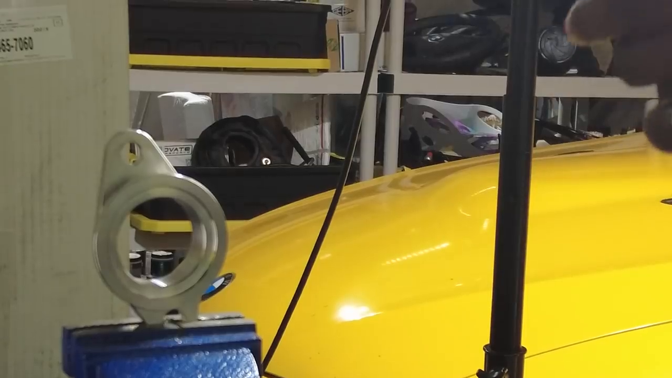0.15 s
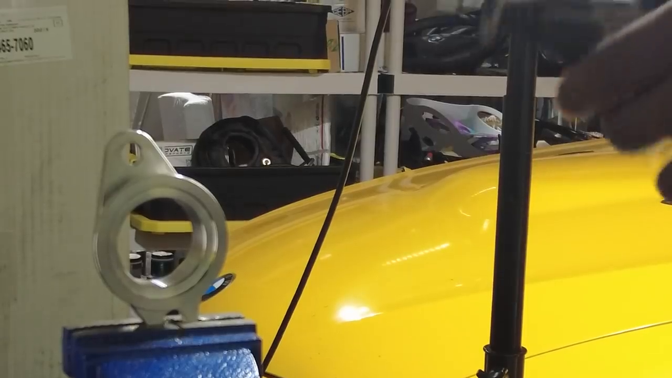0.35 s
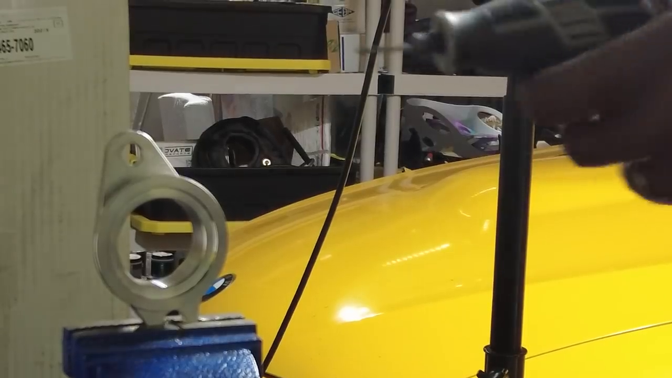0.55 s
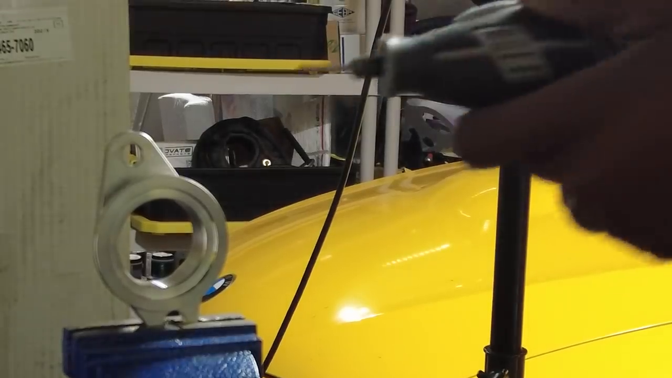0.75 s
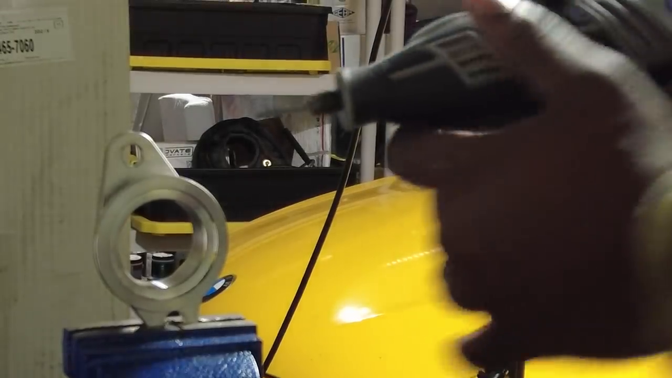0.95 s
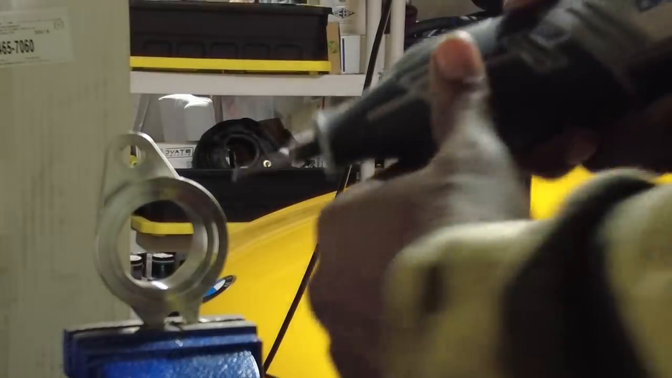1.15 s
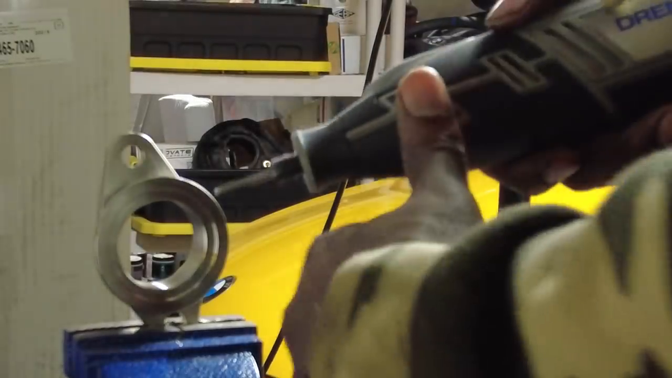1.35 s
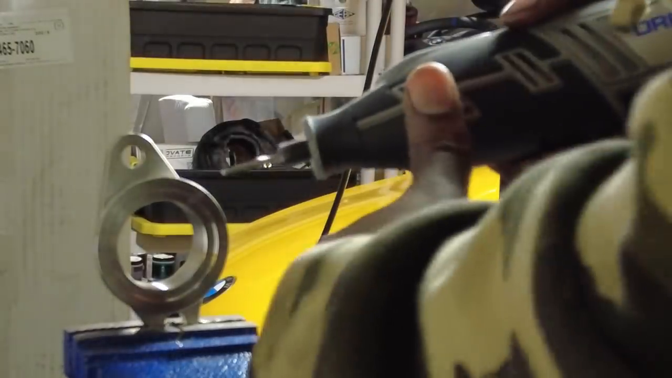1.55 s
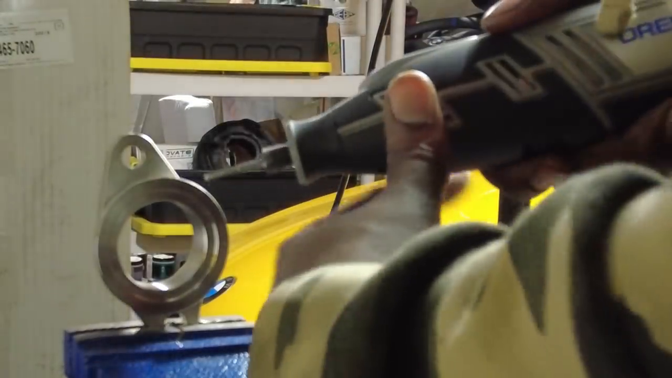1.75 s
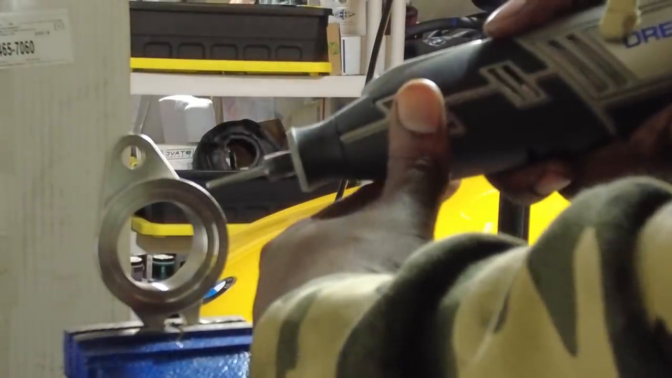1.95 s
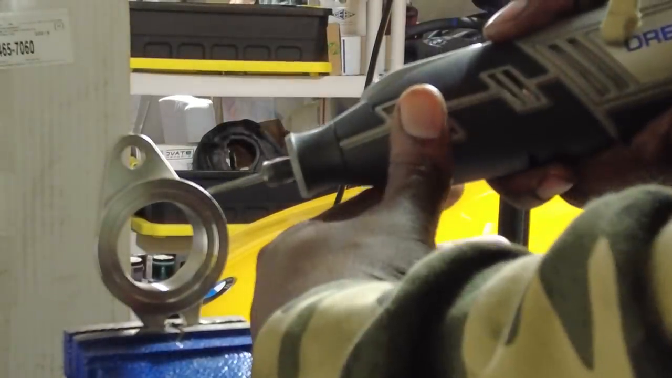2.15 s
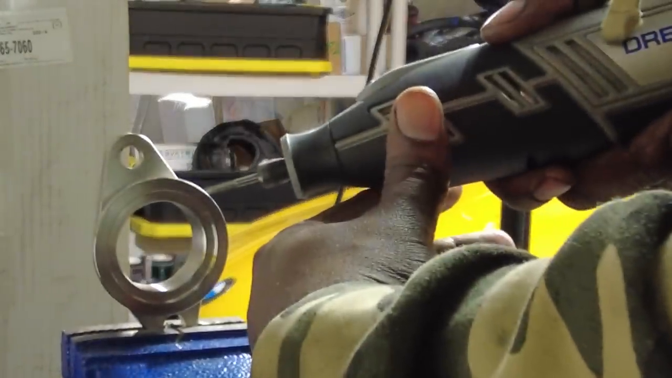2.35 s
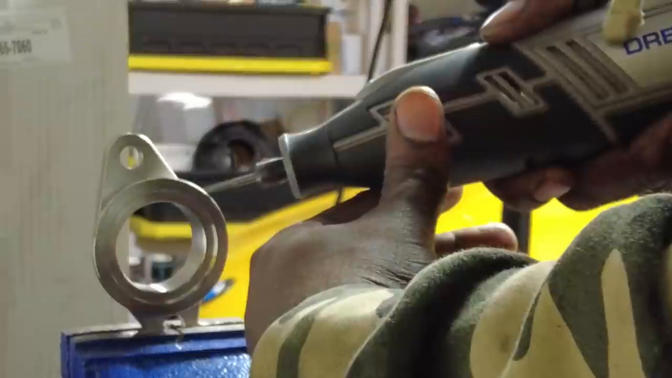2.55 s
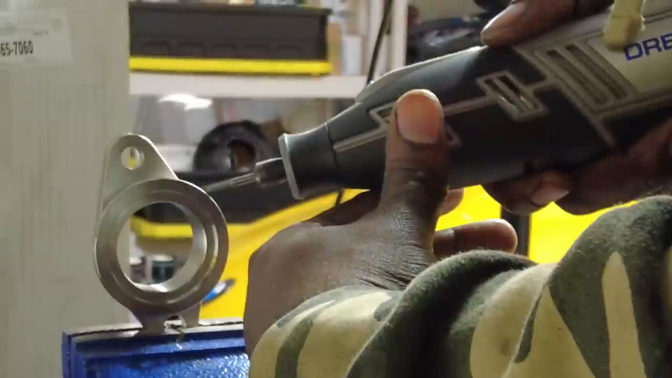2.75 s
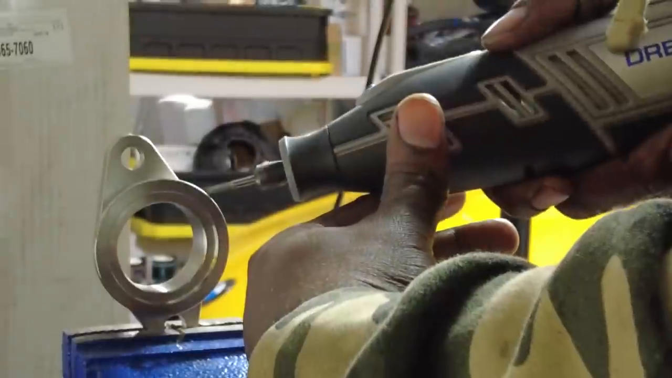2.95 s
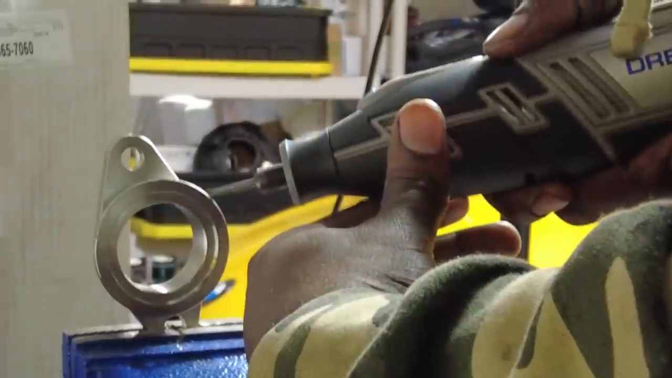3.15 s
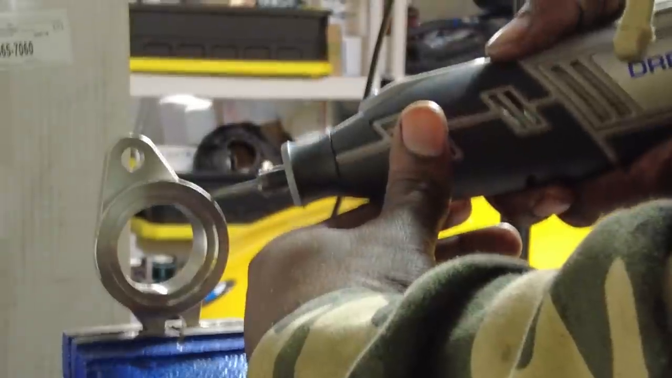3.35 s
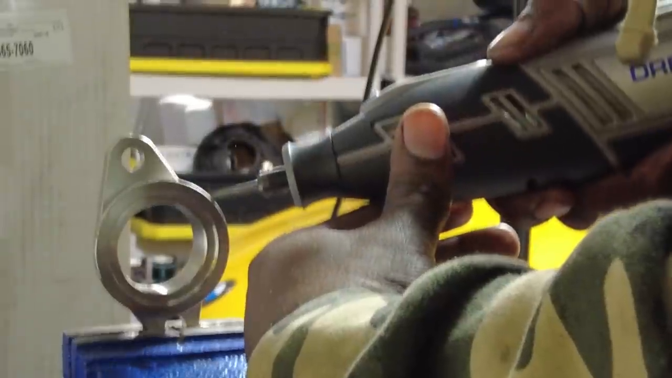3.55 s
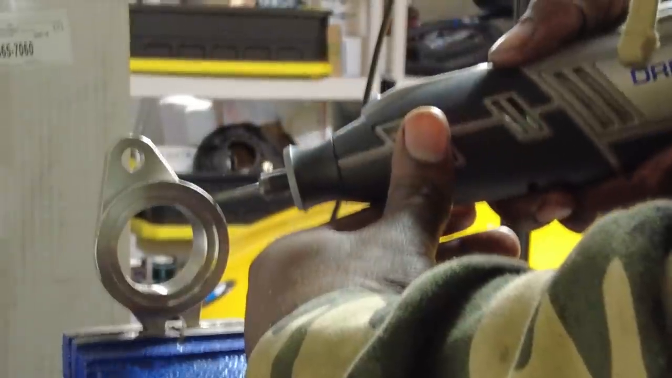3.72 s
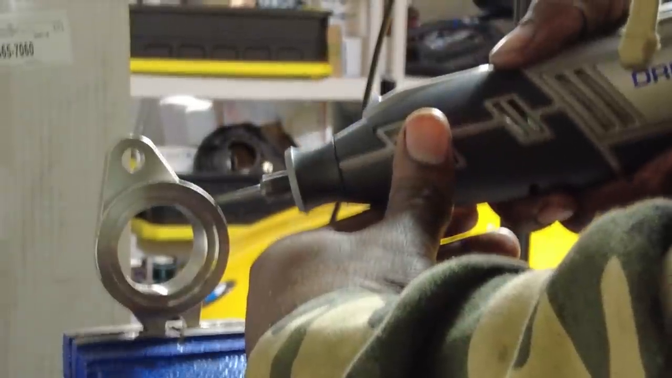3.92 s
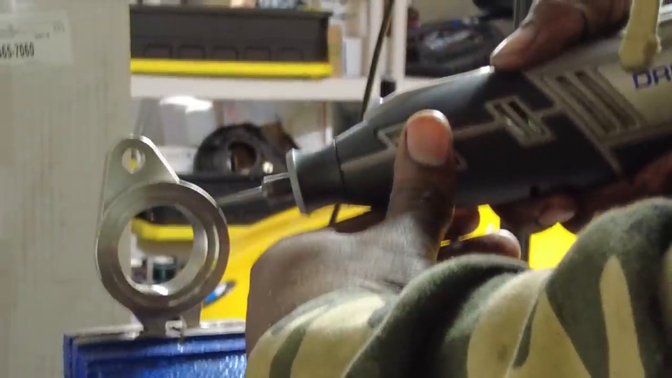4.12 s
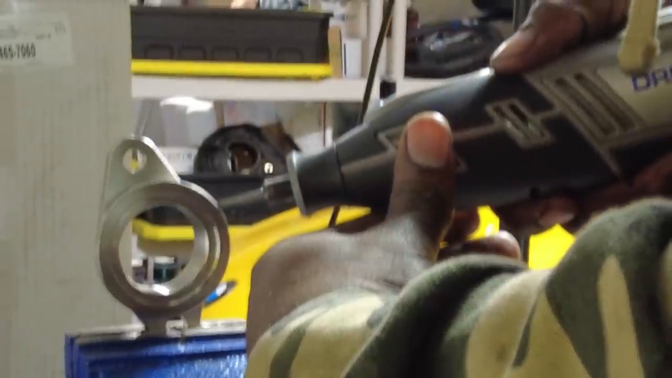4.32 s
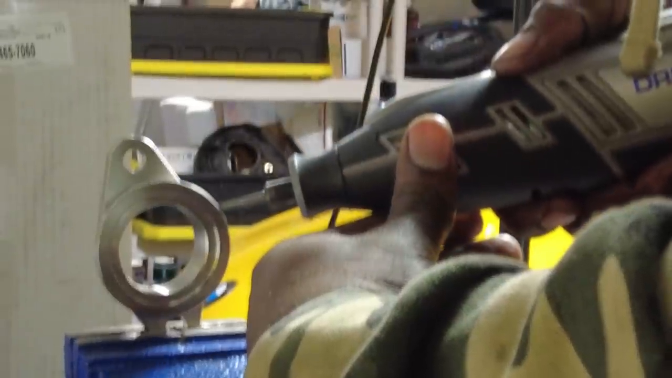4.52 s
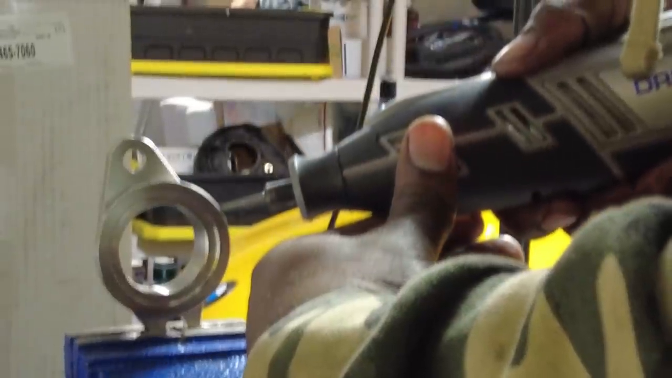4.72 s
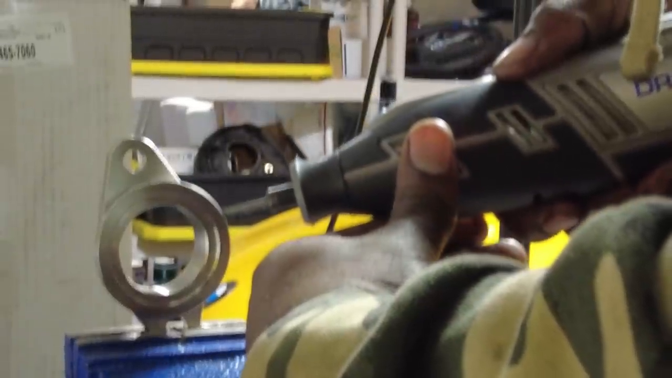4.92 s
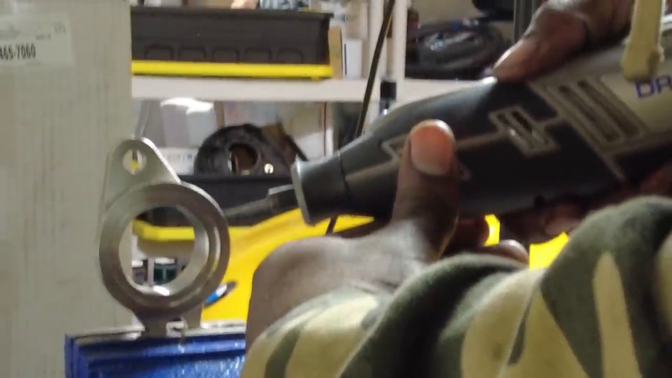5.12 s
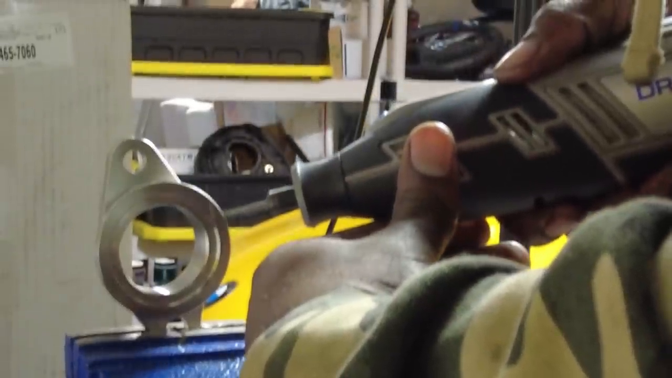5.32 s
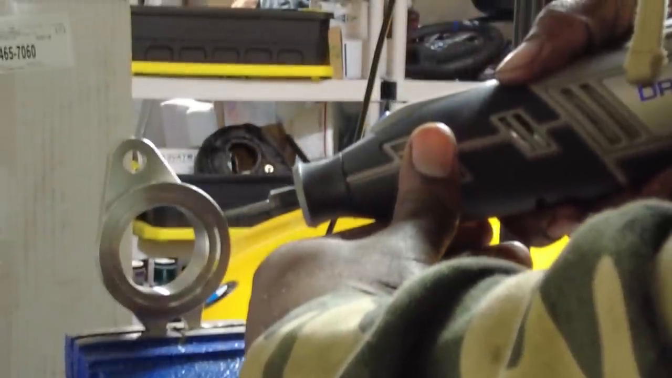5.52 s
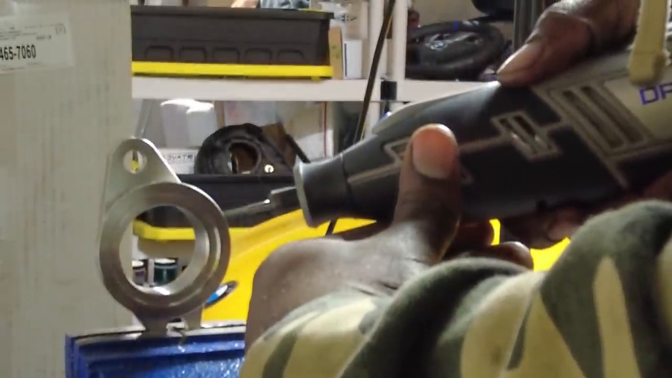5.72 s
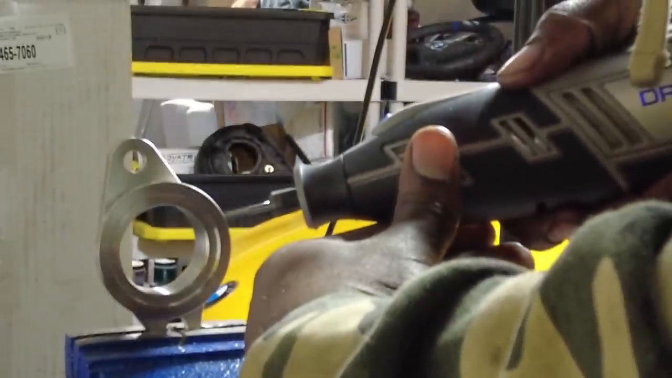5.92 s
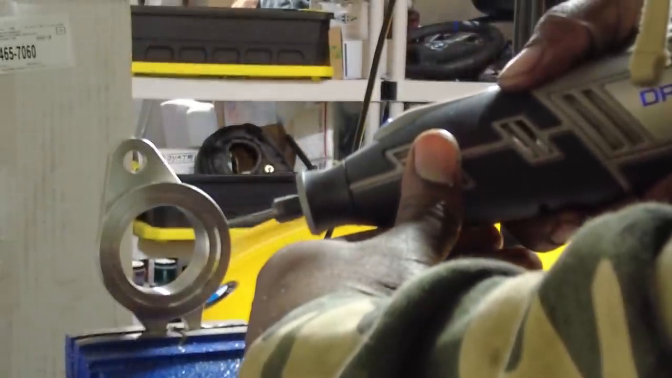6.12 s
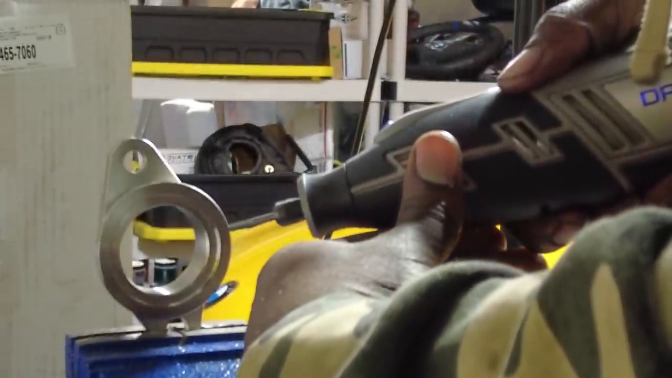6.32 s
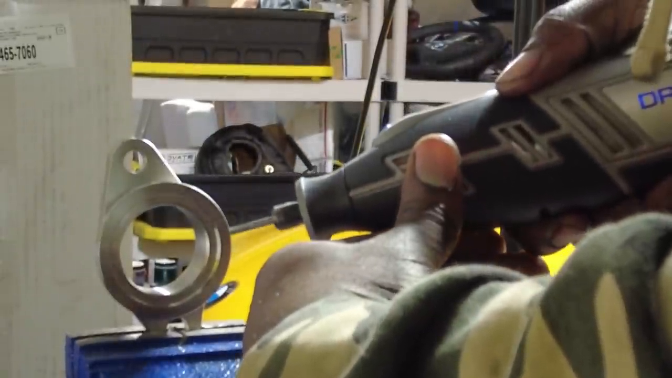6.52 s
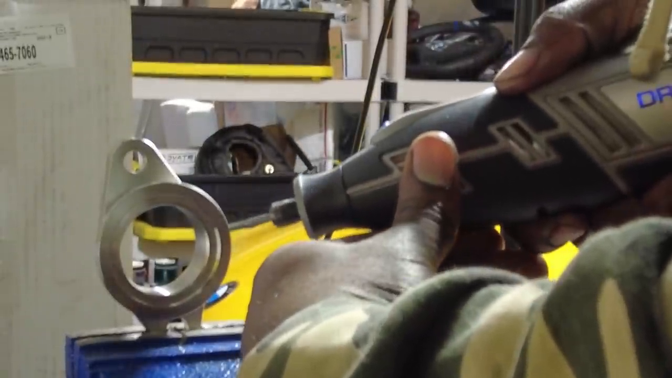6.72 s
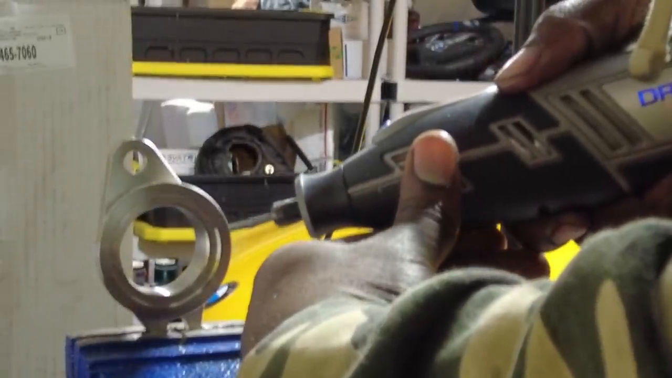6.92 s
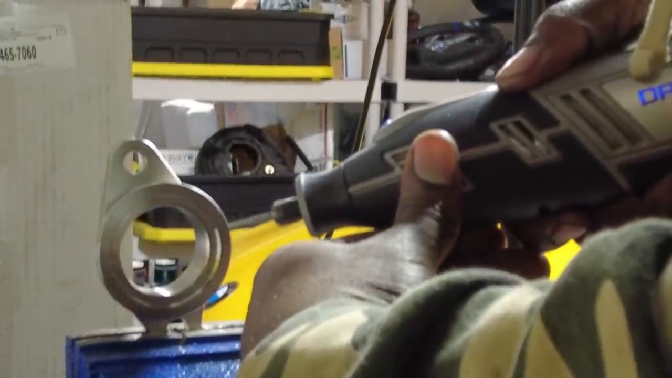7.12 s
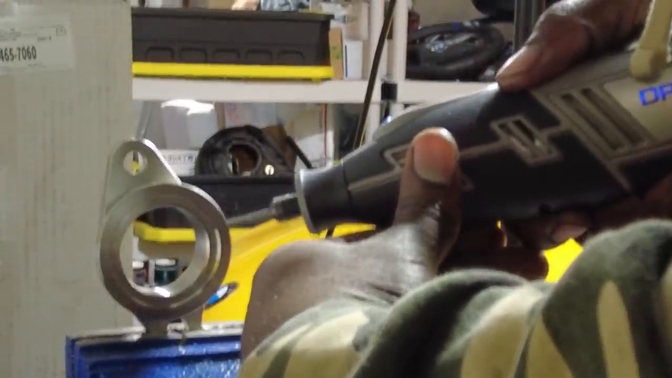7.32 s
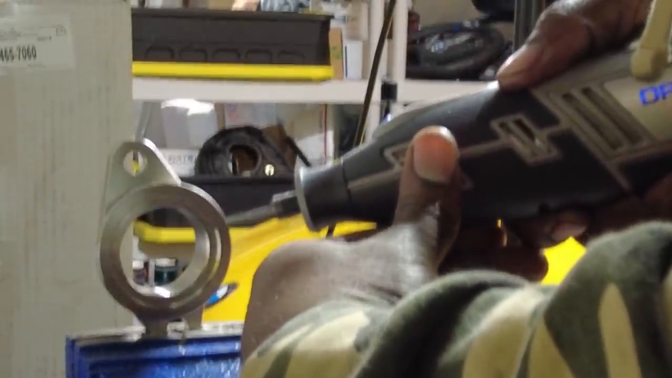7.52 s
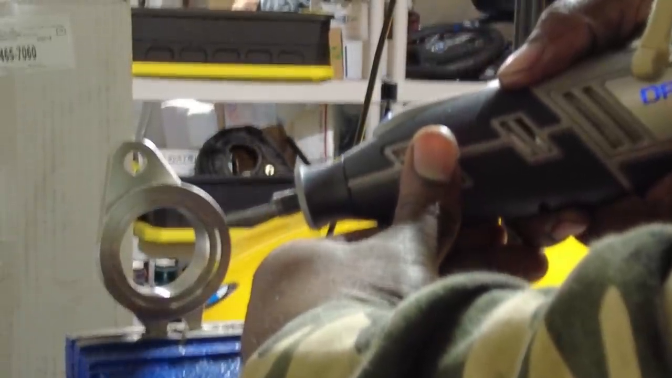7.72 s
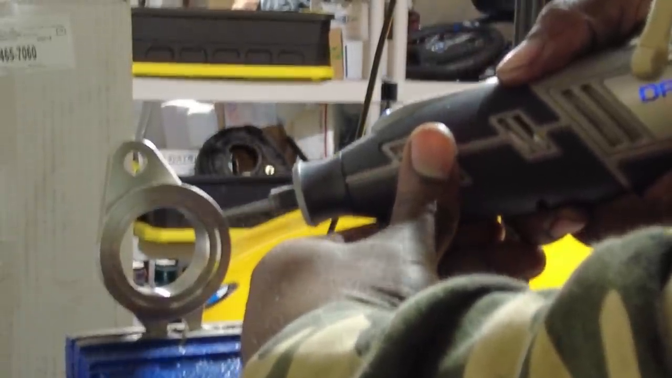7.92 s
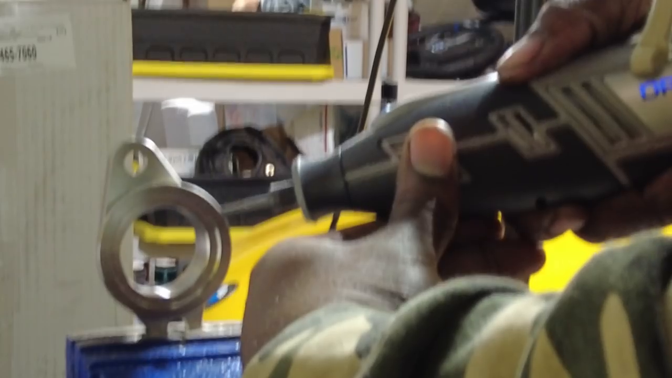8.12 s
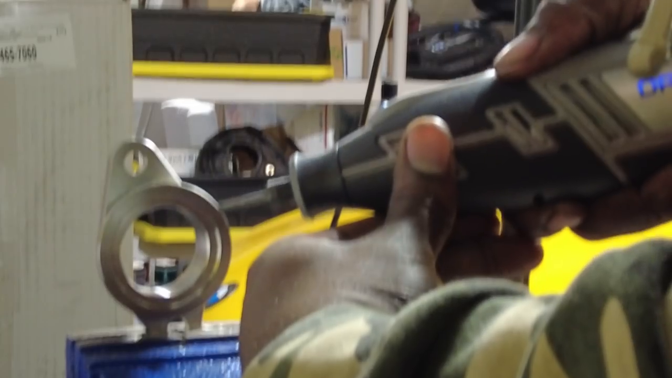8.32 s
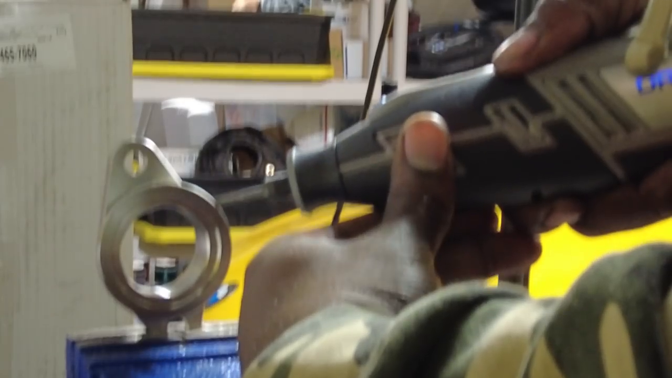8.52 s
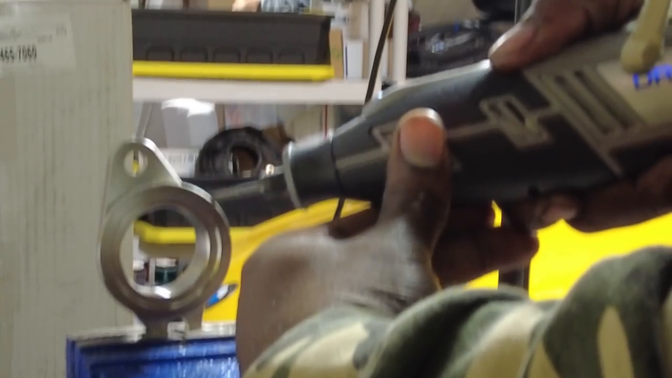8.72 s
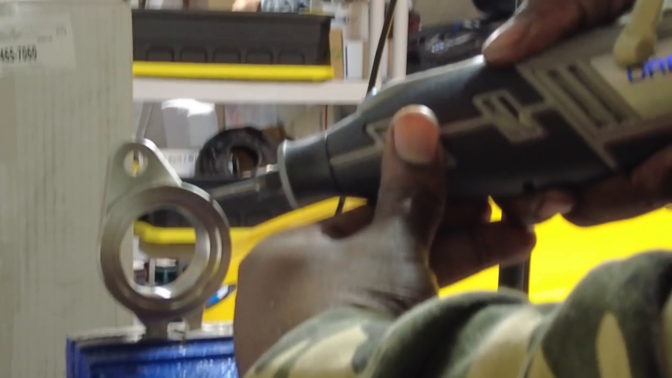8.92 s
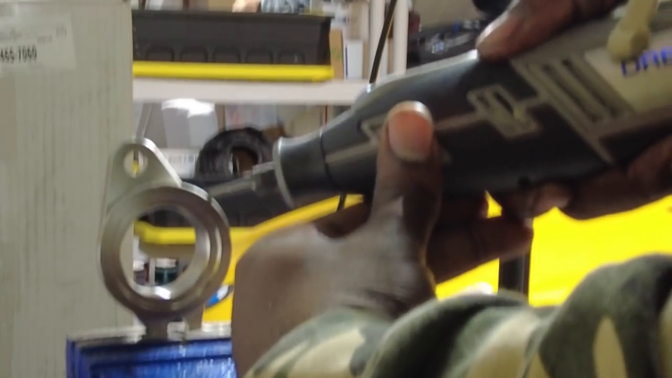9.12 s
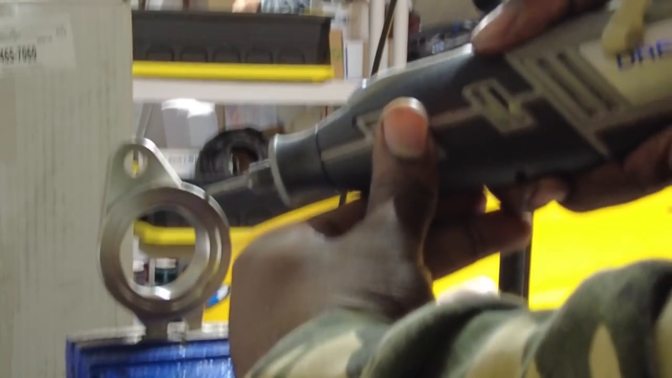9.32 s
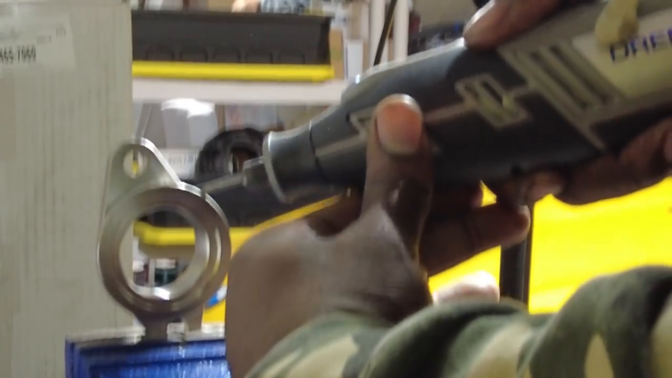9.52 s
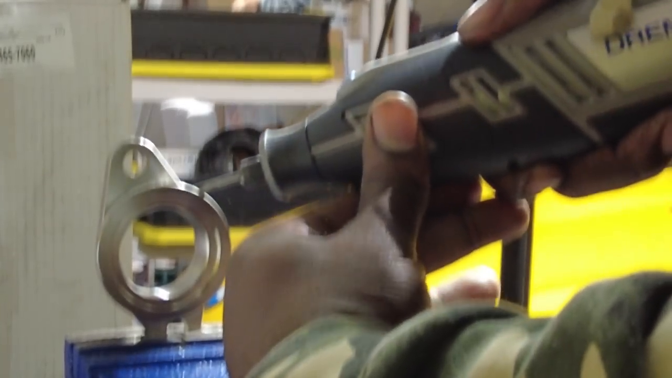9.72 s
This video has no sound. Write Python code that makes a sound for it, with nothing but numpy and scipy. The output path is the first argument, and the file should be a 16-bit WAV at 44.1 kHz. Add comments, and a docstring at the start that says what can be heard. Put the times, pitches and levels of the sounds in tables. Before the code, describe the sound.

A handheld rotary tool spins up, whines, then grinds a metal flange twice with a ringing, hissing rasp in a garage.

```python
"""A handheld rotary tool grinds a metal flange in a vice: it spins up, touches once, then cuts twice.
The off-centre cutter strikes once a turn and rings the flange, chips hiss, and the tone colour shifts
as the hand moves from spot to spot. Under the cut the unbalanced shaft drones, bearings whine and the
fan blows; the housing rattles in the loose first grip. The garage adds a short echo, rumble and hum.
All is heard through the two close microphone ports of a camera near the vice."""
import sys
import numpy as np
from scipy import signal
from scipy.fft import rfft, irfft, next_fast_len
from scipy.io import wavfile
from scipy.ndimage import uniform_filter1d

SR = 44100
rng = np.random.default_rng(int(sys.argv[2]) if len(sys.argv) > 2 else 0)


def transcribe(u):
    """Save the signal u as a 16-bit wav file named by the first command-line argument.

    u: samples, shape (n,) or (channels, n), limited to [-1, 1]; the rate is SR.
    q: integer samples, one column per channel.
    """
    v = np.clip(np.atleast_2d(u).T, -1, 1)
    q = np.round(v * 32767).astype(np.int16)
    wavfile.write(sys.argv[1], SR, q)


N = 430416
FULL_HZ, CAGE_TURNS = 295, 8  # working shaft speed; shaft turns per beat of the bearing cage


def grinding(turns, drop_db):
    """The cutter rings the flange and throws chips, whose hiss pulses once a turn."""
    # how hard the cutter bites, one envelope per contact: time_s, level_db
    cuts = [
        [(2.853, -33), (2.863, -25), (2.878, -32)],
        [(2.997, -20.5), (3.06, -18.5), (3.3, -17), (3.58, -23), (4.1, -20), (4.5, -19.5), (4.75, -19.5),
         (4.92, -17.5), (5.2, -18), (5.66, -20.5), (5.7, -28.5), (5.76, -27), (5.79, -39)],
        [(6.407, -21.5), (6.44, -19), (6.5, -16), (6.75, -16.5), (7.3, -19.5), (7.8, -18.5), (7.97, -18),
         (8.25, -19), (8.47, -20.5), (8.52, -16.5), (8.6, -22.5), (8.74, -18.5), (9.0, -21), (9.25, -18),
         (9.76, -19.5)],
    ]
    # flange resonances: pitch_hz, width_hz, side_db (relative to mid)
    flange_modes = [(1209.6, 137, 2), (1448, 170, -14), (1760, 199, -29), (2882, 860, -12.5),
                    (3538, 166, -9.5), (4240, 410, -15), (6127, 580, -29), (7780, 960, -22),
                    (8970, 390, -11.5), (12130, 330, -12), (13900, 360, -9)]
    # balance at each spot, relative to the cut: chips_db, then ring_db for each resonance
    spot_mix = {"touch": (-13, -27, -23, -13, -13, -16, -5, -6, -21, -10, -25, -28),
                "rim": (-9.5, -6, -26.5, -12.5, -9.5, -9.5, -8.5, -6.5, -22, -14.5, -22.5, -28),
                "face": (-9.5, -21.5, -28, -12.5, -12, -15.5, -12, -5, -17, -10, -17, -24),
                "groove": (-10, -19.5, -28, -10.5, -8.5, -8.5, -14, -8.5, -22, -13, -22, -25),
                "edge": (-11.5, -10.5, -34, -12.5, -11, -12.5, -7, -6, -19, -18, -19, -21),
                "graze": (-12, -5, -25, -15.5, -10.5, -10, -2.5, -9.5, -19, -20, -22, -23),
                "bore": (-7, -15.5, -19.5, -14, -14, -7.5, -6.5, -6.5, -22, -20, -23, -23),
                "lip": (-7, -8.5, -20, -9.5, -13.5, -7.5, -8, -11, -23, -29, -25, -27),
                "step": (-5, -7.5, -19.5, -5, -11, -10, -10, -9.5, -20, -28, -26, -30),
                "burr": (-5, -9, -11, -8, -10, -9, -9.5, -9, -18.5, -24, -26, -36)}
    # colour of the chip hiss: frequency_hz, density_db
    chip_spectrum = [(210, -55), (350, -31.5), (868, -9.5), (1030, -51), (1170, 4), (1330, -14.5),
                     (1720, -5.5), (2190, -8), (3470, -5.5), (6260, -1), (15800, -14.5)]
    level_db = np.max([curve(cut, -120)[0] for cut in cuts], axis=0) - drop_db
    chips_db, *ring_db = at_spot(spot_mix)
    force = cutter_force(turns)
    flange = 0
    for k, ((hz, width, side_db), db) in enumerate(zip(flange_modes, ring_db)):
        gain = undb(db + 2.0 * walk(30) - 0.3 * drop_db)  # rings drop further than chips in a skip
        mode = (-1) ** k * ring(force, hz, width) * gain
        flange = flange + ports(mode, np.roll(mode, int(SR / hz / 4)), side_db)
    pulse = 1 + .5 * np.cos(2 * np.pi * turns)
    chips = ports(noise(chip_spectrum) * pulse, noise(chip_spectrum), -1.36)
    chips *= undb(chips_db + 1.36 * walk(20))
    return (flange + chips) * undb(level_db + 0.78 * walk(25))


def cutter_force(turns):
    """The off-centre cutter lands one uneven blow a turn and scrapes after each."""
    # roughness at each spot: scrape_share (0-1, of the power)
    roughness = {"touch": (.1,), "rim": (.07,), "face": (.07,), "groove": (.05,), "edge": (.08,),
                 "graze": (.06,), "bore": (.12,), "lip": (.1,), "step": (.2,), "burr": (.4,)}
    hits = np.flatnonzero(np.diff(np.floor(turns))) + 1
    late = (turns[hits] % 1) / (turns[hits] - turns[hits - 1])  # samples since the exact blow
    strength = undb(2.06 * rng.standard_normal(N // 100)[:len(hits)])
    taps = np.arange(-8, 8)
    clicks = np.sinc(taps + late[:, None]) * np.hanning(18)[1:-1]  # placed between samples
    blows = np.zeros(N + 16)
    blows[hits[:, None] + taps + 8] = strength[:, None] * clicks
    scrape = np.exp(-(turns % 1) / 0.66) * rng.standard_normal(N)
    share = at_spot(roughness)[0]
    return np.sqrt(1 - share) * unit(blows[8:N + 8]) + np.sqrt(share) * unit(scrape)


def cutter_skips():
    """How many dB the cut drops as the cutter skips, a bell-shaped dip each time."""
    # skips: centre_s, drop_db, length_s
    skips = [(3.025, 4.5, 0.011), (3.217, 4.5, 0.015), (3.333, 4.5, 0.043), (3.796, 4.5, 0.02),
             (3.889, 4, 0.013), (4.056, 3.5, 0.084), (4.284, 4, 0.029), (5.168, 4, 0.026),
             (5.267, 4.5, 0.067), (5.439, 5.0, 0.047), (5.568, 4, 0.055), (6.45, 4, 0.03), (6.788, 4, 0.03),
             (7.004, 4, 0.031), (7.095, 4.5, 0.022), (7.167, 4, 0.036), (7.24, 4.5, 0.03),
             (7.333, 4, 0.042), (7.518, 4, 0.045), (7.673, 3, 0.03), (7.801, 4, 0.0966), (8.025, 4, 0.024),
             (8.195, 5.5, 0.076), (8.25, 4, 0.04), (8.376, 3.5, 0.061), (8.44, 5, 0.028),
             (8.553, 4.5, 0.0571), (8.67, 3, 0.04), (8.788, 6.5, 0.029), (8.901, 4.5, 0.09),
             (8.951, 3, 0.04), (9.188, 3, 0.025), (9.31, 3, 0.02), (9.374, 2.5, 0.029), (9.448, 3, 0.024)]
    t = np.arange(N) / SR
    return sum(db * np.exp(-(2 * (t - s) / length) ** 2) for s, db, length in skips)


def shaft_turns(drop_db, ease_hz_per_db=0.72, ease_s=0.028):
    """Running count of turns; the shaft gains speed while the cutter skips."""
    # shaft speed without the skips: time_s, speed_hz
    speed = [(0, 100), (.1, 140), (.19, 180), (.25, 212), (.34, 265), (.4, 284), (.5, 293.5), (.65, 298),
             (3.0, 303.2), (3.42, 296.5), (4.4, 297.4), (5.15, 297), (5.65, 301.5), (5.95, 307.5),
             (6.2, 308.6), (6.42, 308.6), (7.0, 294), (7.4, 292), (7.8, 291), (8.0, 294), (8.2, 290.5),
             (9.05, 290.5), (9.45, 287.5), (9.76, 288.5)]
    surge_hz = ease_hz_per_db * uniform_filter1d(drop_db, int(ease_s * SR))
    return np.cumsum(curve(speed)[0] + surge_hz) / SR


def unbalance(turns):
    """Unbalance shakes hand and vice: a drone and rumble that grow steeply with speed."""
    # shake at each spot: first_order_db, second_order_db, third_order_db, rumble_db
    spot_shake = {"far": (-50.5, -64, -60, -80), "near": (-45, -50.5, -41, -80),
                  "touch": (-48, -53, -47, -80), "lifted": (-50, -65, -31.5, -66),
                  "graze": (-52, -44, -40, -60), "rim": (-40, -39.5, -33, -62),
                  "face": (-44.5, -53, -31.5, -77), "groove": (-43, -41.5, -28.5, -71),
                  "edge": (-49, -43, -36, -68), "bore": (-47.5, -36, -42, -60), "lip": (-40, -40, -42, -64),
                  "step": (-38, -46, -36, -63), "burr": (-33, -51, -43, -49.5)}
    # colour of the rumble: frequency_hz, density_db
    rumble_spectrum = [(40, -20), (100, -8), (160, 0), (240, -7), (380, -23), (500, 8), (700, -20),
                       (1500, -60)]
    *order_db, rumble_db = at_spot(spot_shake)
    rumble = undb(rumble_db + 2.3 * walk(8)) * noise(rumble_spectrum)
    drone = sum(undb(db) * tone(turns, k + 1, 1.4) for k, db in enumerate(order_db))
    shake = (rumble + drone) * speed_ratio(turns) ** 7.7
    return ports(shake, np.roll(shake, 20), -17.0)


def motor(turns, air_db=4.0, brush_db=-21.5):
    """Fan air, bearing whine and a treble comb from the brushes; the cage flutters air and comb."""
    # colour of the fan air: frequency_hz, density_db
    fan_spectrum = [(210, -26), (350, -18.5), (398, -27), (631, -11.5), (827, -19), (925, -1.5),
                    (1080, -21), (1470, -7.5), (1590, -9), (2650, -10.5), (3820, -16), (4550, -13),
                    (15800, -25)]
    # bearing, armature and fan tones: shaft_multiple, level_db
    whine_orders = [(2.11, -14.5), (3.125, -11.5), (3.25, -15), (4.125, -10), (4.75, -25), (4.88, -8),
                    (5, -14), (6, -29), (6.12, -12.5), (6.25, -22), (6.38, -23), (9, -10.5), (12, -17),
                    (13, -12.5), (16, -13.5), (24, -20.5), (25, -15), (31, -17), (32, -41)]
    # whine with the tool held far or near: gain_db
    whine_trim = {"far": (-4.5,), "near": (0.0,)}
    # motor fader as the hand carries the tool: time_s, gain_db
    carry = [(0.0, -50.5), (0.49, -38.5), (0.85, -37), (2.8, -36.5), (5.85, -34), (6.33, -36)]
    cage = np.sin(2 * np.pi * turns / CAGE_TURNS)
    air = ports(noise(fan_spectrum) * (1 + 0.12 * cage), noise(fan_spectrum), -7.5) * undb(walk(12))
    whine = sum(undb(db) * tone(turns, k) for k, db in whine_orders)
    whine *= undb(at_spot(whine_trim)[0]) * speed_ratio(turns) ** 1.4
    brushes = sum(tone(turns + .003 * cage, k, 3.8) for k in range(37, 53))
    tones = whine + undb(brush_db) * brushes
    return (undb(air_db) * air + ports(tones, np.roll(tones, 3), -24)) * undb(curve(carry)[0])


def housing_rattle(turns):
    """In the loose first grip, each cage beat rings the housing with a knock and a noisy tail."""
    # housing resonances: pitch_hz, width_hz, relative_db
    housing_modes = [(1255, 88, 1), (1570, 130, -2), (1846, 140, -7), (2650, 300, -4), (3140, 150, -8)]
    # rattle envelope: time_s, level_db
    envelope = [(.3, -60), (.33, -41.5), (.7, -39), (1.0, -38), (1.2, -52), (1.5, -70)]
    beat = (turns / CAGE_TURNS) % 1
    knocks = unit(np.diff(beat, prepend=0) < 0)
    force = knocks + unit(np.exp(-beat / .5) * rng.standard_normal(N))
    rings = unit(sum(undb(db + 2.0 * walk(12)) * ring(force, hz, width)
                     for hz, width, db in housing_modes))
    return ports(rings, np.roll(rings, 9), -8) * undb(curve(envelope, -120)[0])


def spin_up(turns, end_s=0.58, fade_s=0.2):
    """Rising whines that swell with speed and fade as the shaft settles."""
    # orders that sing out: shaft_multiple, level_db
    orders = [(6, -49), (8, -45), (12, -45.5)]
    t = np.arange(N) / SR
    swell = speed_ratio(turns) ** 1.3 * np.clip((end_s - t) / fade_s, 0, 1)
    return swell * sum(undb(db) * tone(turns, k, 1.9) for k, db in orders)


def speed_control(turns, switch_hz=8200, level_db=-49, fade_s=0.87):
    """Two thin whistles, 3 and 6 shaft orders below the switching rate, fall and fade at the start."""
    t = np.arange(N) / SR
    whistles = sum(np.sin(2 * np.pi * (switch_hz * t - k * turns)) for k in (3, 6))
    return whistles * undb(level_db) * np.clip(1 - t / fade_s, 0, 1)


def garage_echo(direct, t60_s=0.33, level_db=-6):
    """The walls answer with a short diffuse tail, different at each port."""
    t = np.arange(SR // 2) / SR
    tail = rng.standard_normal((2, len(t))) * undb(-60 * t / t60_s)
    tail /= np.linalg.norm(tail, axis=1, keepdims=True)
    return undb(level_db) * signal.fftconvolve(direct.mean(axis=0, keepdims=True), tail, axes=1)[:, :N]


def garage_tone(rumble_db=-52):
    """A bed of low rumble and two steady hums."""
    # colour of the room rumble: frequency_hz, density_db
    room_spectrum = [(12, -34), (20, 3), (62, -0.5), (71, -4), (86, -12.5), (124, -7), (260, -19),
                     (340, -34), (570, -120)]
    # hums: pitch_hz, level_db
    hum_tones = [(59, -57.5), (465, -59.5)]
    t = np.arange(N) / SR
    hums = sum(np.sqrt(2) * undb(db) * np.sin(2 * np.pi * hz * t) for hz, db in hum_tones)
    return undb(rumble_db) * ports(noise(room_spectrum), noise(room_spectrum), -25) + hums


def duck(cut, threshold_db=-30, slope=0.9, lag_s=0.17):
    """The camera's automatic gain, which sinks as the cut gets loud."""
    pole = np.exp(-1 / (lag_s * SR))
    level_db = 10 * np.log10(uniform_filter1d(cut ** 2, 2000) + 1e-12)
    over_db = np.maximum(level_db - threshold_db, 0)
    return undb(-slope * signal.lfilter([1 - pole], [1, -pole], over_db))


def at_spot(table, glide_s=0.13):
    """Columns of a table of spots at every sample, gliding as the hand moves."""
    # where the hand holds the tool: start_s, spot
    hand_moves = [(0, "far"), (1.08, "near"), (2.8, "touch"), (2.95, "near"), (2.998, "rim"),
                  (3.38, "face"), (4.33, "groove"), (4.621, "face"), (4.8, "groove"), (5.13, "edge"),
                  (5.54, "graze"), (5.78, "lifted"), (6.39, "graze"), (6.48, "rim"), (6.82, "bore"),
                  (7.5, "lip"), (8.55, "step"), (9.17, "burr")]
    moves = [(s, table[spot]) for s, spot in hand_moves if spot in table]
    departures = [(s - glide_s / 2, *row) for (s, _), (_, row) in zip(moves[1:], moves)]
    arrivals = [(s + glide_s / 2, *row) for s, row in moves]
    return curve(sorted(departures + arrivals))


def speed_ratio(turns):
    """Shaft speed as a share of working speed, capped at 1."""
    return np.clip(np.gradient(turns) * SR / FULL_HZ, 0, 1)


def tone(turns, multiple, waver_db=3.5):
    """A shaft order that wavers in level, rms near 1."""
    return np.sqrt(2) * undb(waver_db * walk(9)) * np.sin(2 * np.pi * (multiple * turns + rng.random()))


def ring(x, hz, width_hz):
    """A resonance applied twice, so that the valleys stay dark; rms 1."""
    for _ in range(2):
        x = signal.lfilter(*signal.iirpeak(hz, hz / width_hz, SR), x)
    return unit(x)


def noise(spectrum):
    """Noise coloured by (frequency_hz, density_db) points, rms 1."""
    hz, db = np.transpose(spectrum)
    size = next_fast_len(N)
    log_hz = np.log(np.arange(1, size // 2 + 2) * SR / size)
    colour = undb(np.interp(log_hz, np.log(hz), db))
    return unit(irfft(rfft(rng.standard_normal(size)) * colour, size)[:N])


def walk(rate_hz):
    """A drift that glides between random values, rms 1."""
    step = int(SR / rate_hz)
    return unit(uniform_filter1d(np.repeat(rng.standard_normal(N // step + 1), step), step)[:N])


def curve(table, outside=None):
    """Value columns of a (time_s, ...) table at every sample."""
    s, *columns = np.transpose(table)
    return np.array([np.interp(np.arange(N) / SR, s, c, outside, outside) for c in columns])


def ports(mid, side, side_db):
    """Left and right from mid and side."""
    return np.array([mid + undb(side_db) * side, mid - undb(side_db) * side])


def undb(db):
    """Gain of a level in dB."""
    return 10 ** (np.asarray(db) / 20)


def unit(x):
    """Scaled to rms 1."""
    return x / np.sqrt(np.mean(x ** 2))


def scene():
    """Tool and flange in the garage; only the motor and the room tone duck under the cut."""
    drop_db = cutter_skips()
    turns = shaft_turns(drop_db)
    shake = unbalance(turns)
    cut = grinding(turns, drop_db)
    gain = duck(cut.mean(axis=0))
    direct = cut + shake + gain * motor(turns)
    direct += speed_control(turns) + spin_up(turns) + housing_rattle(turns)
    return direct + garage_echo(direct) + gain * garage_tone()


def record(dry):
    """The left port is a little louder; peaks are rounded and the top is cut at 15.8 kHz."""
    lean = undb([[.5], [-.5]])
    rounded = np.tanh(1.2 * dry * lean) / 1.2
    return signal.sosfilt(signal.ellip(10, .2, 80, 15800, fs=SR, output="sos"), rounded)


dry = scene()
out = record(dry)
transcribe(out)
```